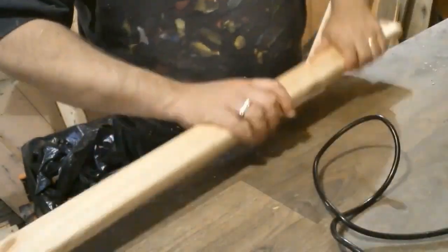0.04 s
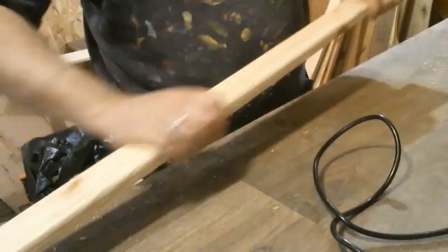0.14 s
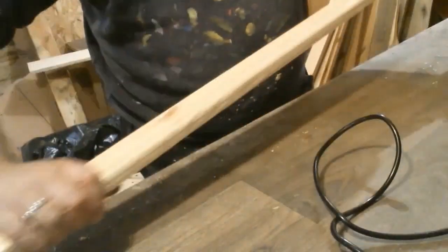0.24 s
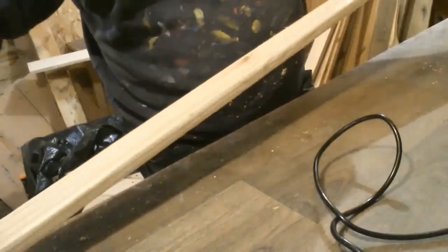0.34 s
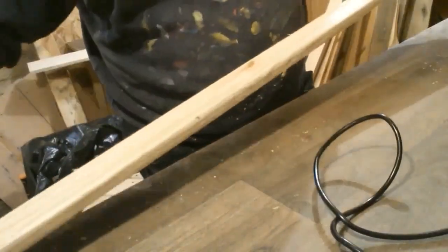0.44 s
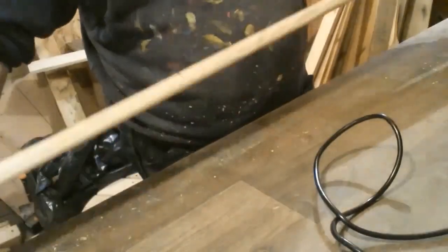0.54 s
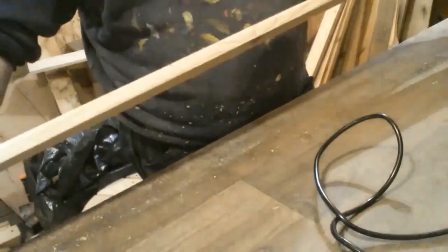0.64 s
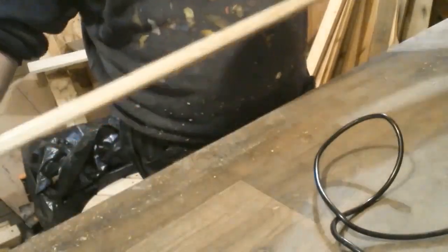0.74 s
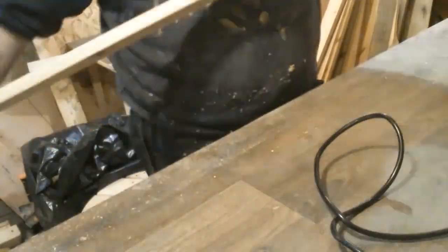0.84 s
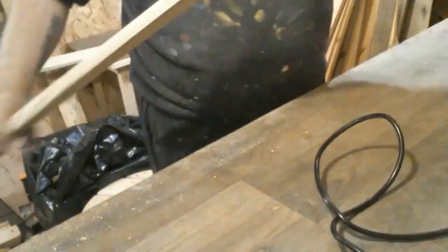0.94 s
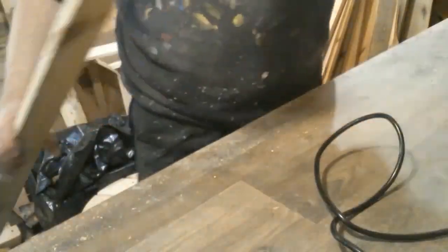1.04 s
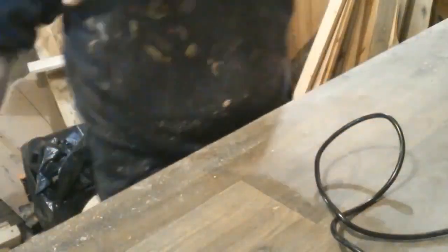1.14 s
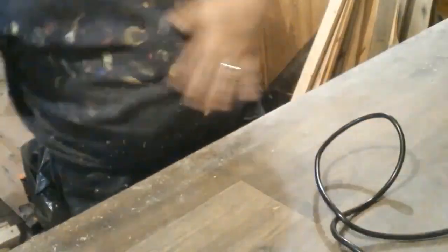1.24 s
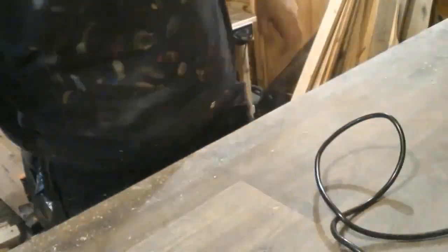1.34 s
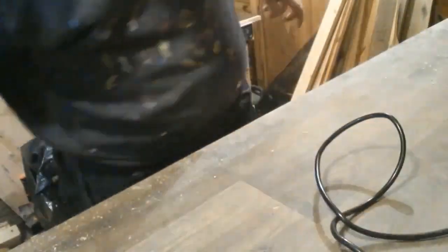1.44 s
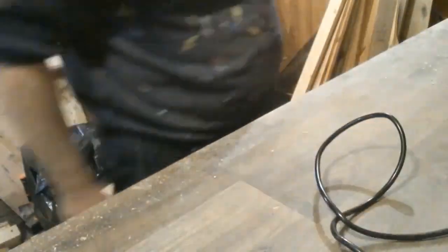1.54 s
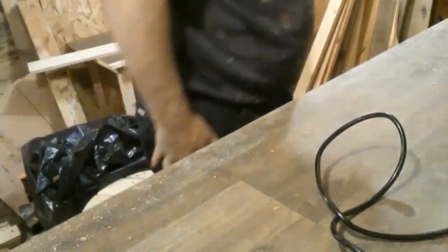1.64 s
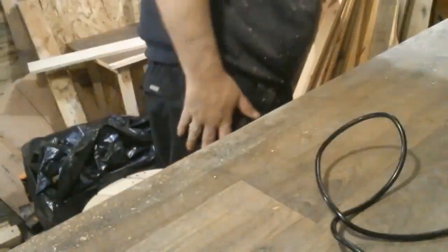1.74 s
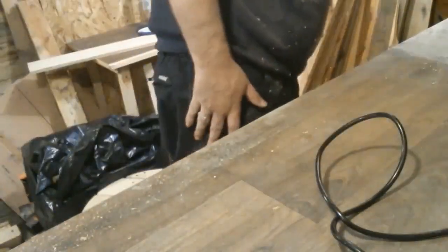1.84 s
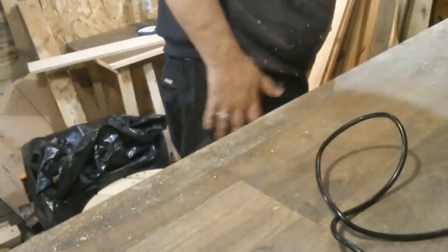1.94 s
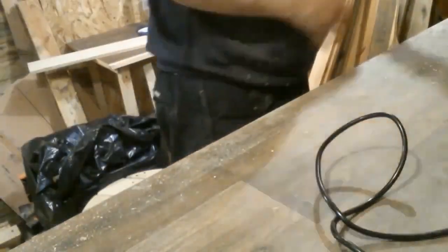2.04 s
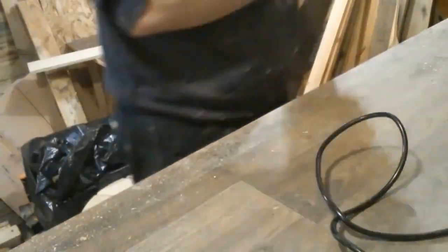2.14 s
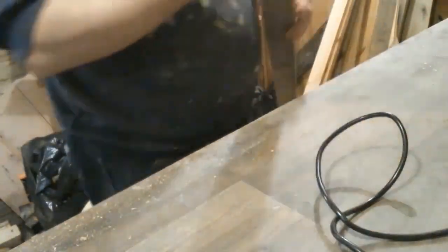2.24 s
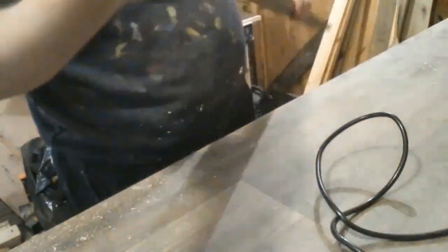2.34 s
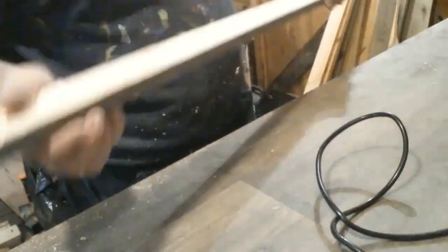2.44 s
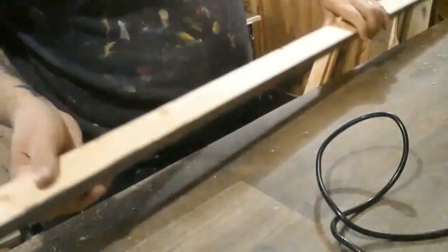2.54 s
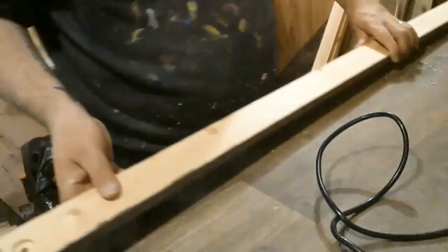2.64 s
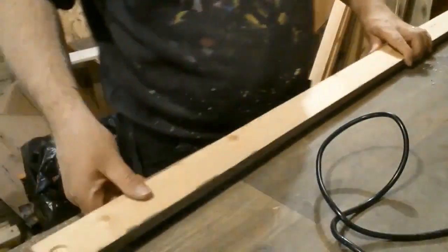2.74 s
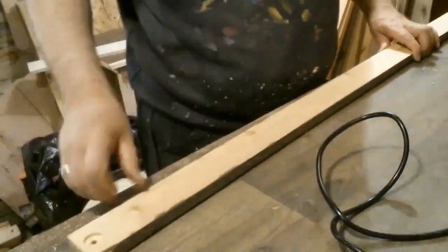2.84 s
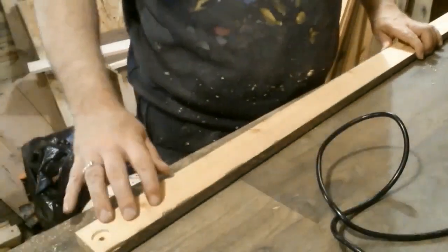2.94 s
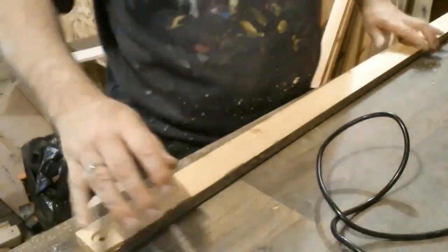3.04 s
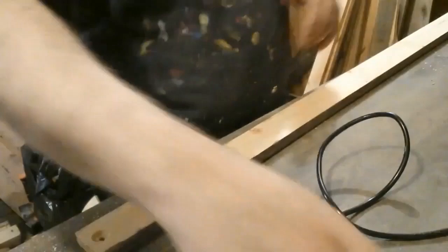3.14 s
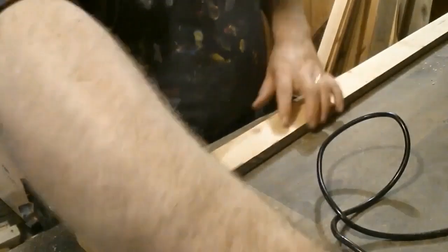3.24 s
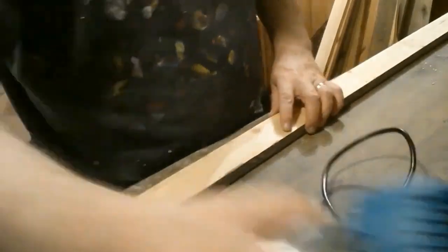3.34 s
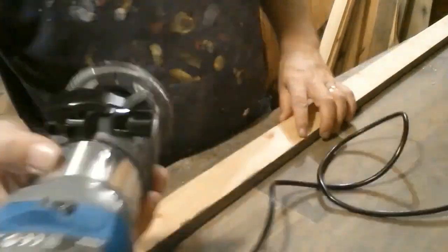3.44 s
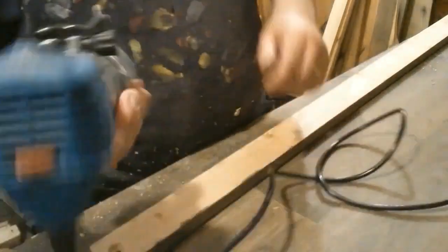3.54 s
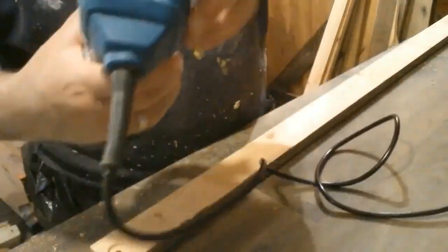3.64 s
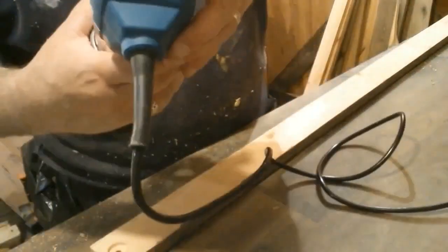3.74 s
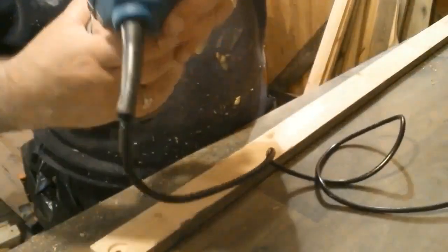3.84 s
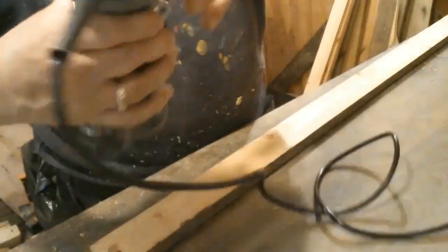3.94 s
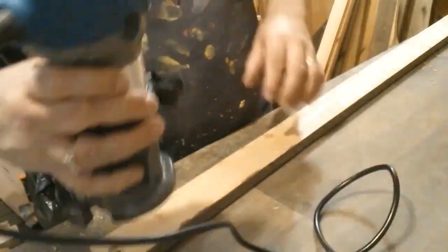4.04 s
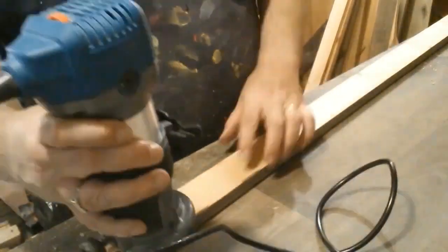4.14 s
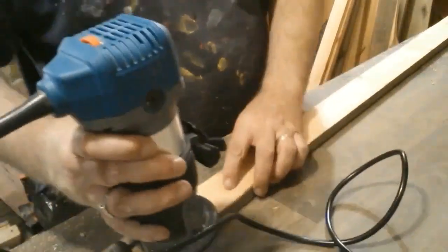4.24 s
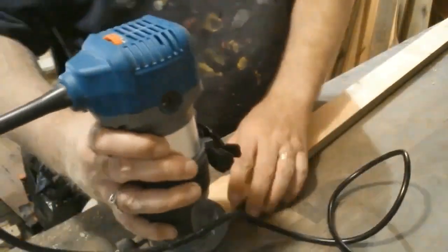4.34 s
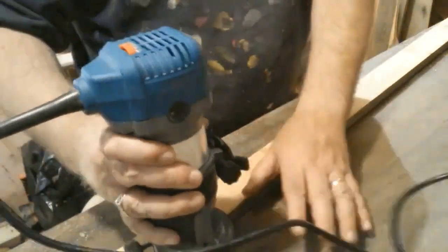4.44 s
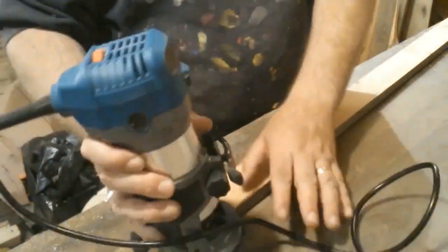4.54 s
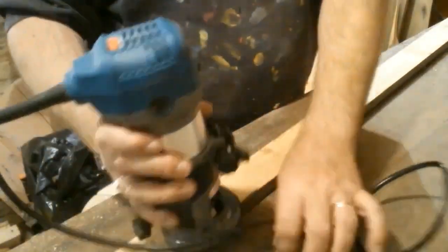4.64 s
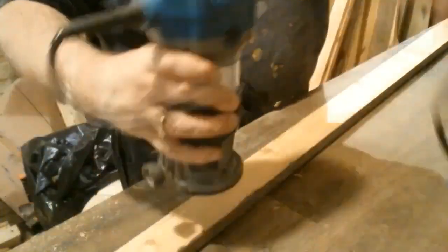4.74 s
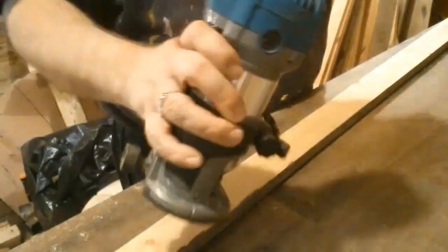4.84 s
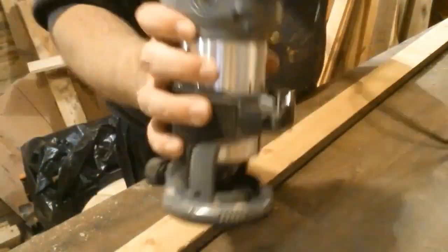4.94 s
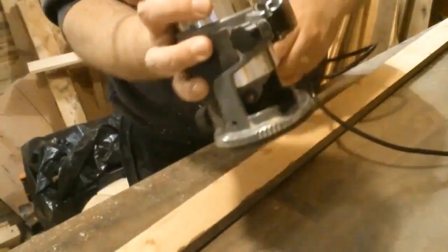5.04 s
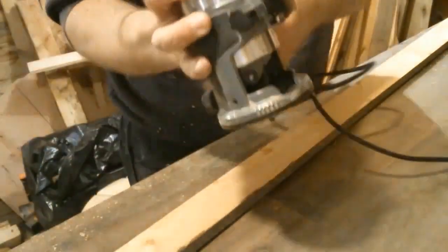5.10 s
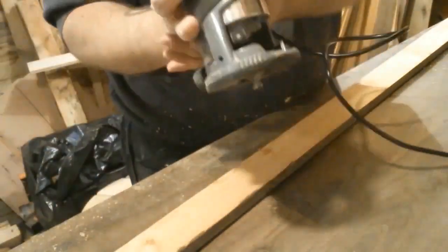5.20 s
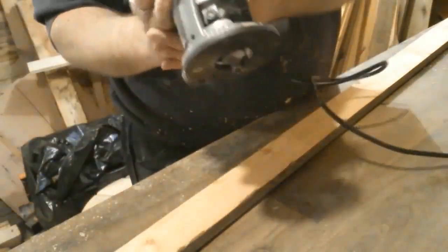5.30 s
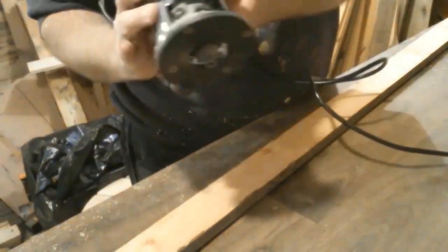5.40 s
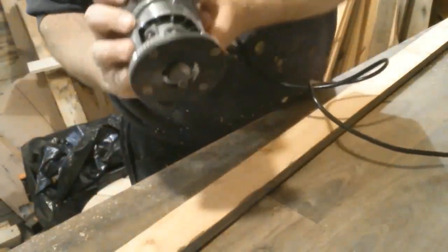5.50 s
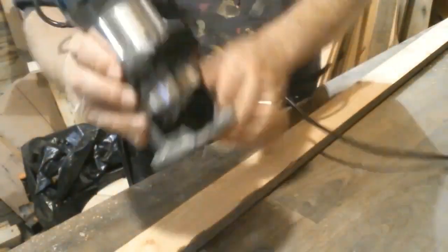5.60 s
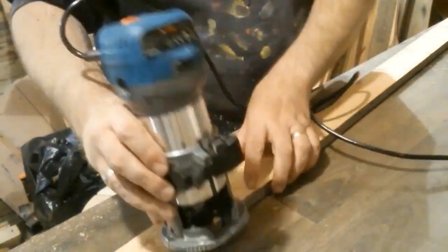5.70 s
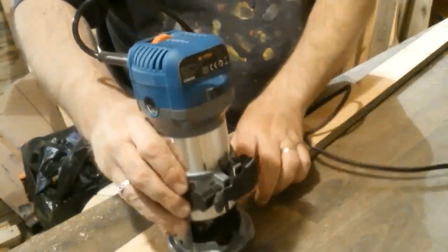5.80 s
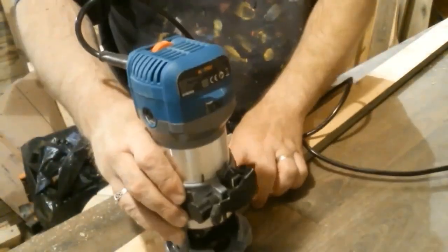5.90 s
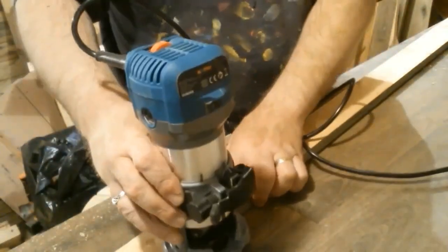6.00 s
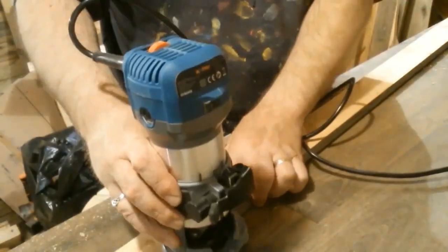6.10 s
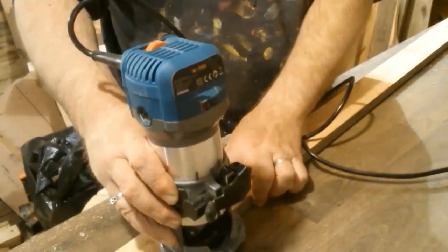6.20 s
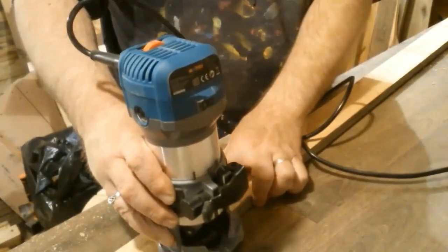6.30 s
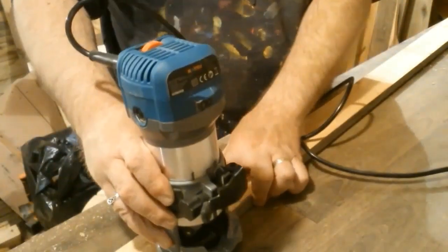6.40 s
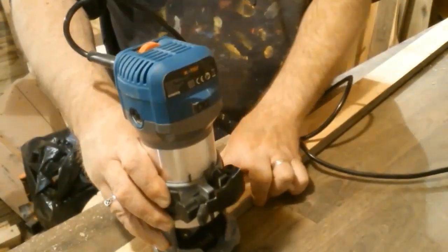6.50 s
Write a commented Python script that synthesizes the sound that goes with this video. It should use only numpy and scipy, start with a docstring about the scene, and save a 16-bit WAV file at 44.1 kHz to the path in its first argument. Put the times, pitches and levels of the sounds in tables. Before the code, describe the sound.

A wooden plank slides off a workbench with a brief hissy scrape and a few light knocks in the first half second. Hands and clothing rustle faintly as it is turned. A loud, hollow wooden knock comes at about 1.3 seconds, and another at 2.8 as the plank is laid down, followed by small taps. At about 3.8 seconds a compact electric router switches on and climbs quickly to a high whine over a strong hiss of cooling air. The whine flutters, surging and fading and shifting between left and right as the tool is moved. Two small bright ticks come near 4.8 and 5.2 seconds, and the base bumps softly on the wood around 5.6. From about 6.3 seconds the pitch sags slightly as the bit meets the edge, and the motor is still running at the end, around 6.5 seconds. Everything sounds close, in a small, dry workshop.

```python
"""A compact router spins up to a whine over a rush of cooling air, in a small, dry workshop.
First a man slides a plank off the bench, turns it round and lays it down: the wood scrapes and rings,
his clothes rustle. Then the motor starts, its harmonics swelling and fading as the vents swing about.
The router is tipped, set on the plank with soft bumps, and sags a little as the bit meets the edge."""
import sys
import numpy as np
from scipy import signal
from scipy.fft import rfft, irfft
from scipy.io import wavfile
from scipy.ndimage import uniform_filter1d

SR = 44100
rng = np.random.default_rng(int(sys.argv[2]) if len(sys.argv) > 2 else 0)


def waveform_to_disk(signal):
    """Save audio, clipped to [-1, 1], as 16-bit WAV at the path in sys.argv[1]."""
    frames = np.transpose(np.atleast_2d(signal))
    scaled = np.clip(frames, -1, 1) * 32767
    samples = np.round(scaled).astype(np.int16)
    wavfile.write(sys.argv[1], SR, samples)


N = 289296
TIME = np.arange(N) / SR
FRAME_S, BIN_HZ = np.arange(N // 256 + 6)[:, None] * 256 / SR, np.fft.rfftfreq(1024, 1 / SR)
ON_S, TOP_HZ = 3.8316, 1663.06  # switch-on; the pitch the whine heads for, four beats to a shaft turn
# stereo image of the handling and the room tone: f/Hz, left-right likeness (-1..1)
QUIET_LIKENESS = [(60, 0.97), (300, 1), (700, 0.9), (1400, 0.5), (3100, 0.1), (7000, -.2), (15000, -0.13)]


def amp(db):
    """Decibels to gain."""
    return 10 ** (np.asarray(db) / 20)


def unit(x):
    """Scales to rms 1."""
    return x / np.sqrt(np.mean(abs(x) ** 2) + 1e-20)


def read(points, hz):
    """Reads a spectrum on a log-frequency axis."""
    f, value = np.transpose(points)
    return np.interp(np.log(hz + 1), np.log(f + 1), value)


def curves(table, t):
    """Every column of an automation table at the times t."""
    s, *columns = np.transpose(table)
    return [np.interp(t, s, c) for c in columns]


def bell(offset, width):
    """A smooth hump of height 1 that falls to a half at width / 2 either side."""
    return .5 ** ((2 * offset / width) ** 2)


def add(mix, s, sound):
    """Mixes a stereo sound in at s seconds."""
    part = mix[:, max(round(s * SR), 0):][:, :sound.shape[1]]
    part += sound[:, :part.shape[1]]


def wander(rate_hz):
    """Smooth complex random modulation of rms 1, mostly slower than rate_hz."""
    f = np.fft.fftfreq(8192, 1 / 1000)
    white = rng.standard_normal(len(f)) + 1j * rng.standard_normal(len(f))
    slow = np.fft.ifft(white / (1 + abs(f / rate_hz) ** 2) * (abs(f) < 4 * rate_hz))
    return unit(np.interp(TIME, np.arange(len(f)) / 1000, slow))


def band(hz, width_hz):
    """A narrow band of noise around hz."""
    return np.sqrt(2) * (wander(width_hz / 2) * np.exp(2j * np.pi * hz * TIME)).real


def noise(colour_db, likeness, patchy_db, size, hollow=.45):
    """Coloured stereo noise of rms 1, with patches of size (frames, bins) that dip more than they rise."""
    a, b, c, d, mid, side = rng.standard_normal((6, len(FRAME_S), len(BIN_HZ)))
    patches = uniform_filter1d(np.array([mid + side / 2, mid - side / 2]), size[0], 1)
    patches = unit(uniform_filter1d(patches, size[1], 2))
    patches = (1 - np.exp(-hollow * patches)) / hollow
    same = np.clip(read(likeness, BIN_HZ), -1, 1)
    left = a + 1j * b
    right = same * left + np.sqrt(1 - same ** 2) * (c + 1j * d)
    colour = amp(colour_db)
    colour /= np.linalg.norm(colour, axis=-1, keepdims=True)
    spectra = np.array([left, right]) * colour * amp(patchy_db * patches)
    return unit(signal.istft(spectra.swapaxes(1, 2), nperseg=1024, noverlap=768)[1][:, :N])


def tint(x, colour):
    """Filters x by a spectrum and scales it to rms 1."""
    size = x.shape[-1]
    return unit(irfft(rfft(x) * amp(read(colour, np.fft.rfftfreq(size, 1 / SR))), size))


def stroke(start, length, attack_s=0.019, release_s=0.025):
    """Envelope of one stroke: it swells, holds and dies away."""
    rise = np.clip((TIME - start) / attack_s + .5, 0, 1)
    return rise * np.clip((start + length - TIME) / release_s + .5, 0, 1)


def handling(slide_s=0.356, fade_db_per_s=34, grain_db=1.0):
    """Wood sliding on the bench and cloth on skin: a dull rub, a grainy scrape and a fine hiss."""
    # tone of the three friction layers: f/Hz, relative level/dB
    rub_colour = [(25, -28), (55, -33.5), (110, -5.5), (190, -9), (280, 5.5), (350, -3.5), (520, -4.5),
                  (650, -3.5), (800, -13), (1100, -34.5), (1600, -36), (3000, -66.5)]
    scrape_colour = [(400, -10.5), (750, 0), (1080, -0.5), (1450, -7), (1900, -5), (2600, -8), (3900, -11),
                     (5000, -18), (10000, -58)]
    hiss_colour = [(1500, -20.5), (3000, -7.5), (4500, -2), (8000, 0), (12000, -1.5), (14500, 1.5),
                   (17000, 2.5)]
    # strokes of hands, cloth and wood: t/s, length/s, scrape level/dB, hiss level/dB
    strokes = [(0, 0.1, -54, -62), (0.196, 0.13, -61, -69), (0.349, 0.087, -93, -56),
               (0.453, 0.032, -75, -58.5), (0.519, .1, -90, -67.5), (0.651, 0.12, -81, -66),
               (0.713, 0.018, -65, -58.5), (0.797, 0.042, -70.5, -64), (0.81, 0.3, -79, -58.5),
               (1.129, 0.018, -57.5, -52), (1.146, 0.036, -66, -70), (1.195, 0.096, -78, -62.5),
               (1.585, 0.16, -84, -76), (1.666, 0.064, -67, -65.5), (1.877, 0.1, -93, -79),
               (2.135, 0.17, -79, -72.5), (2.202, 0.16, -76, -63.5), (2.285, 0.041, -63, -68),
               (2.466, 0.44, -86.5, -75.5), (2.733, 0.083, -73, -64), (2.853, 0.037, -64.5, -68.5),
               (3.153, 0.035, -70, -71.5), (3.201, 0.1, -78.5, -72), (3.383, 0.062, -67, -66),
               (3.42, 0.19, -83.5, -77)]
    # dull rubbing as the man moves about: t/s, level/dB
    shuffle = [(0, -61), (.37, -66), (.66, -63), (.92, -61), (1.45, -69.5), (1.8, -63.5), (2.0, -69.5),
               (2.32, -63.5), (2.52, -75.5), (2.84, -67), (3.0, -74.5), (3.18, -66.5), (3.42, -65),
               (3.68, -76.5), (3.82, -76.5)]
    slide = stroke(0, slide_s) * amp(-fade_db_per_s * TIME)  # the plank is pulled off ever more lightly
    scrape, hiss = amp(-61) * slide, amp(-38.5) * slide
    for start, length, scrape_db, hiss_db in strokes:
        touch = stroke(start, length)
        scrape = np.hypot(scrape, amp(scrape_db) * touch)
        hiss = np.hypot(hiss, amp(hiss_db) * touch)
    rub = amp(curves(shuffle, TIME)[0])
    scrape = np.hypot(scrape, amp(-15) * rub)  # clothes rustle with every move
    hiss = np.hypot(hiss, amp(-11.5) * rub)
    grain = unit(amp(grain_db * wander(150).real))  # fibres catch and slip
    out = rub * noise(read(rub_colour, BIN_HZ), QUIET_LIKENESS, patchy_db=3.5, size=(16, 2))
    out += scrape * grain * noise(read(scrape_colour, BIN_HZ), QUIET_LIKENESS, patchy_db=5.5, size=(8, 3))
    out += hiss * grain * noise(read(hiss_colour, BIN_HZ), QUIET_LIKENESS, patchy_db=3.5, size=(10, 3))
    return out


def room_tone(level_db=-82):
    """The still air of the workshop, a faint bed of low noise."""
    # tone of the room: f/Hz, relative level/dB
    colour = [(30, 15.5), (200, 25.5), (600, 5.5), (1200, 6.5), (3000, 5.5), (8000, 1), (15000, -2)]
    return amp(level_db) * noise(read(colour, BIN_HZ), QUIET_LIKENESS, patchy_db=1.0, size=(20, 4))


def plank_knocks(reach_octaves=0.63, contact_s=0.00059, crack_rise_s=0.0015, crack_t60=0.04,
                 room_db=-17, room_t60=0.15):
    """Each blow rings the wood around its own pitch, with a short crack and a brief room tail."""
    # modes of the plank on the bench: f/Hz, relative level/dB, t60/s
    wood = [(263, 1.5, 0.053), (275, -4, 0.065), (358, -4, 0.061), (413, -4, 0.064), (450, -11.5, .06),
            (595, 1.5, 0.052), (713, -10, 0.098), (796, -6.5, 0.036), (866, -10, .04), (930, -6.5, 0.052),
            (966, -13.5, .045), (1110, -20.5, 0.033), (1246, -14.5, 0.069), (1530, -20.5, 0.06),
            (1630, -17.5, 0.06), (1930, -21, 0.05), (2141, -24.5, 0.05), (2300, -20.5, .06),
            (2830, -26, .045), (3354, -23.5, 0.055), (3650, -23.5, 0.06)]
    # blows of plank and hands: t/s, ring level/dB, most excited f/Hz, crack level/dB
    blows = [(0.014, -44.5, 1200, -47), (0.072, -34, 490, -56), (0.083, -39, 484, -66),
             (0.283, -49, 700, -78), (0.3, -43.5, 710, -76), (0.451, -58, 350, -86), (0.596, -54, 293, -87),
             (0.61, -55, 280, -82), (0.8157, -50.5, 600, -68), (1.1368, -66, 1100, -53.5),
             (1.328, -25, 617, -50), (1.3322, -24.5, 212, -49), (1.349, -43.5, 800, -57.5),
             (1.521, -53.5, 500, -77), (1.578, -66, 547, -80), (1.914, -65, 600, -84),
             (2.188, -57, 900, -57), (2.7941, -28.5, 800, -42.5), (2.7966, -36, 450, -64),
             (2.807, -53, 750, -73), (2.823, -55, 230, -85), (2.844, -51, 240, -83),
             (2.8608, -46, 520, -58), (2.8635, -49.5, 230, -73), (2.871, -56, 260, -73),
             (3.149, -55, 805, -67), (3.376, -60, 800, -78), (3.529, -80, 900, -70.5)]
    # tone of the crack: f/Hz, relative level/dB
    crack_colour = [(200, -17), (700, -4.5), (2000, 1), (4000, -8), (8000, -18), (15000, -15.5)]
    out, t = np.zeros((2, N)), np.arange(SR // 3) / SR
    hz, db, t60 = np.transpose(wood)[:, :, None]
    skew = 0.1505 * (-1) ** np.arange(len(wood))[:, None] * hz / 500  # modes reach the ears out of step
    modes = amp(db - 60 * t / t60) * np.sin(2 * np.pi * hz * t + np.array([skew, -skew]))
    low_cut = signal.butter(4, 182, "high", fs=SR)  # a narrow plank radiates little bass
    room_decay = amp(-60 * t / room_t60)
    crack_decay = amp(-60 * t / crack_t60) + amp(room_db) * room_decay
    for s, ring_db, blow_hz, crack_db in blows:
        grit = rng.standard_normal((4, len(t)))
        ring = (modes / (1 + (np.log2(hz / blow_hz) / reach_octaves) ** 2)).sum(axis=1)
        ring = signal.lfilter(*low_cut, ring * np.minimum(t / contact_s, 1))
        walls = grit[3] * room_decay * (t > .006)
        ring += amp(room_db) * signal.fftconvolve(ring, walls[None] / np.linalg.norm(walls))[:, :len(t)]
        crack = tint(grit[0] + 0.51 * grit[1:3], crack_colour)
        crack *= crack_decay * np.minimum(t / crack_rise_s, 1)
        add(out, s, amp(ring_db) * ring / abs(ring).max() + amp(crack_db) * crack)
    return out


def motor_pitch(t, kick_share=.6359, kick_s=.0746, creep_s=.255, droop_hz_per_s=32.56):
    """Whine pitch in Hz: a quick kick and a slower creep upward, a steady droop, a sag under load."""
    # the bit meets the edge: t/s, pitch lost/Hz
    load = [(5.85, 0), (6.21, -7), (6.28, 27), (6.33, 35), (6.44, 40), (6.55, 62)]
    running_s = np.maximum(t - ON_S, 0)
    to_gain = kick_share * np.exp(-running_s / kick_s) + (1 - kick_share) * np.exp(-running_s / creep_s)
    return TOP_HZ * (1 - to_gain) - droop_hz_per_s * running_s - curves(load, t)[0]


def motor_whine(jitter=0.00039, drift_db=3.5, sway_rad=0.3, flutter_depth=0.6, flutter_hz=43,
                scatter_db=-64, db_per_decade=53.5):
    """Harmonics beam from the vents and shift as the router turns; swirling air makes them flutter."""
    # main harmonics: t/s, level/dB, left minus right/dB, left phase lead/rad
    fundamental = [(3.9, -68, 1, 0.5), (4.06, -67.5, 2.5, 1.5), (4.19, -47.5, 4.5, 0.3),
                   (4.38, -51, 14.5, -1), (4.75, -54, 18, -3), (4.95, -63.5, -3, -1), (5.14, -67, 1, 3),
                   (5.25, -57, -1, 4), (5.35, -74, -1.5, 1.5), (5.42, -57.5, -6.5, 2), (5.49, -71, -11, 3),
                   (5.6, -59, -1.5, 3), (5.999, -56.5, 4, 2.8), (6.2, -52, 22, 1.1), (6.3, -54, -1, .7),
                   (6.52, -47, 4, 0.3)]
    octave = [(3.9, -73, 5, 0.21), (3.99, -48.5, 3, .5), (4.039, -61, 0.5, 0.3), (4.26, -58.5, -2, 0.39),
              (4.36, -51, 3, -0.91), (4.66, -56.5, -4.5, -1.5), (4.74, -50, 0, -.4), (4.81, -64, 0.5, 0),
              (4.92, -65.5, -1, -0.34), (5.2, -56.5, 5, .7), (5.55, -51, 4, .4), (5.64, -66, -3, -1),
              (5.72, -54, -7, -2), (6.27, -53, -5, -1.2), (6.5, -50, 2.5, -1.3)]
    third = [(3.94, -66, 0, -1.5), (4.05, -49, 0, 1), (4.11, -55, 0, 1.5), (4.15, -45, 0, 0.7),
             (4.23, -43.5, 0, 2.3), (4.38, -48, 0, 2.5), (4.47, -70, 0, -0.5), (4.68, -65.5, 0, .5),
             (4.77, -48.5, 0, -0.5), (4.899, -68, 0, .5), (5.35, -59.5, 0, 1.5), (5.5, -71, 0, 0),
             (6.5, -60.5, 0, -1.5)]  # sings during the run-up
    fourth = [(3.95, -59, 0, 0), (4.15, -62.5, -4.5, 2), (4.21, -40, -9, 1.5), (4.3, -41.5, -12, 1.5),
              (4.34, -51, 3, 2.5), (4.39, -45.5, 4, 2.5), (4.5, -41.5, 2.5, -0.4), (4.88, -46, -0.5, 0.8),
              (5.05, -67, 0.5, 0.5), (5.22, -55, -0.5, 0.7), (5.451, -67.5, -1, -0.5), (5.76, -52, -1, 0),
              (6.1, -47.5, 4, -1), (6.28, -53, 1, -1), (6.52, -51, -3, 1)]  # rings most with the router upright
    eighth = [(3.95, -64, -2, 0), (4.0, -49, -6, 5), (4.035, -36.5, -5, -2), (4.08, -48.5, -2, -1.5),
              (4.35, -45, 5.5, .3), (4.5, -44.5, -1, .3), (4.61, -55, -6, -0.5), (4.76, -45, -2, -0.5),
              (4.94, -49, 1.5, 0.5), (5.031, -45, 1, 2.5), (5.11, -39.5, -1.5, -0.7), (5.2, -53.5, -2.5, 3),
              (5.29, -44.5, -1, 0), (5.38, -40, -3.5, 0), (5.54, -42, -1, -2), (5.59, -46, -4, 4),
              (5.665, -58, 0, 1), (5.71, -38, -1, 1.5), (5.8, -39, -2, -1), (5.84, -47, 0, 3.1),
              (6.2, -48, -0.5, 3.1), (6.24, -47, 0, -3), (6.28, -57, -1, -3), (6.33, -52, 2, 2),
              (6.45, -50, -3, -3), (6.53, -43.5, -11, 0.5)]  # piercing, comes in surges
    # weak harmonics 5, 6, 7, 9, 10 and 12 at top speed: level/dB
    weak_db = [-62, -63.5, -63.5, -60, -64.5, -57.5]
    # flares as the router turns, one list each for harmonics 5, 6 and 7: t/s, length/s, boost/dB
    flare_lists = [
        [(4.16, 0.09, 18), (4.77, 0.15, 8), (6.28, 0.07, 15)],
        [(4.27, 0.13, 15), (6.5, 0.11, 14)],
        [(4.298, 0.14, 11)],
    ]
    hz = motor_pitch(TIME)
    cycles = np.cumsum(hz * (1 + jitter * wander(24).real)) / SR
    speed_db = db_per_decade * np.log10(np.maximum(hz, 1) / TOP_HZ)
    main = {1: fundamental, 2: octave, 3: third, 4: fourth, 8: eighth}
    partials = {k: curves(table, TIME) for k, table in main.items()}
    flares = dict(zip((5, 6, 7), flare_lists))
    for k, db in zip((5, 6, 7, 9, 10, 12), weak_db):
        flare_db = sum(boost_db * bell(TIME - s, length) for s, length, boost_db in flares.get(k, []))
        partials[k] = db + speed_db + flare_db, 0, 0.9
    out = np.zeros((2, N))
    for k, (db, left_db, lead_rad) in partials.items():
        swirl = np.sqrt(k / 8)  # high harmonics waver more, and flutter faster
        level = amp(db + swirl * drift_db * wander(7.7).real)
        for ear, side in zip(out, (1, -1)):
            pan = amp(side * left_db / 2) / np.sqrt((amp(left_db) + amp(-left_db)) / 2)
            phase = side * lead_rad / 2 + sway_rad * swirl * wander(3.3).real
            flutter = unit(1 + flutter_depth * swirl * wander(flutter_hz * swirl))
            direct = level * pan * flutter * np.exp(1j * phase)
            reflected = amp(scatter_db + speed_db) * wander(24)  # each ear meets its own reflections
            ear += np.sqrt(2) * ((direct + reflected) * np.exp(2j * np.pi * k * cycles)).real
    return out * np.clip((TIME - ON_S) / .12, 0, 1) ** 4


def air_colour(morph_s=0.12, edge_lag_s=0.065, lowest_hz=876, db_per_octave=220):
    """Spectrum of the rush in dB, frame by frame: a hollow tone that morphs as the router turns."""
    # the four successive tones of the rush: f/Hz, relative level/dB
    first_tone = [(530, -49), (900, -22.5), (1100, -15), (1450, -20.5), (2080, -5), (2520, -2.5),
                  (3010, -4.5), (3400, -2), (4400, -0.5), (5600, -1), (7480, -1.5), (10300, -0.5),
                  (15700, -1)]
    second_tone = [(1800, -19.5), (2100, -10.5), (2500, -7), (2900, -8.5), (3500, -1), (4400, -1),
                   (5600, -3.5), (6700, 0), (7600, -4.5), (9300, -3), (11000, -2), (12200, -7.5),
                   (13800, -1.5), (15300, -1.1)]
    third_tone = [(1800, -25.5), (2100, -11.5), (2500, -6), (2900, -5), (3500, -1), (4400, 2), (5600, -0.5),
                  (6700, -5.5), (7600, -4), (9300, -5), (11000, 3), (12200, -3), (13800, -1.5), (15300, 1)]
    last_tone = [(1800, -21), (2100, -17), (2500, -9.5), (2900, -9.5), (3500, -0.5), (4400, -3.5),
                 (5600, -1.5), (6700, -4), (7600, -6), (9300, -6.5), (11000, -2), (12200, -11),
                 (13800, -3.5), (15300, -1.5)]
    # times when the rush changes tone: t/s
    tone_changes = [4.195, 5.23, 5.36]
    # brief hollows as the base nears the wood: t/s, length/s, f/Hz, width/octaves, depth/dB
    hollows = [(4.837, 0.15, 4000, 0.49, 6.5), (5.684, 0.085, 3840, 0.79, 8)]
    # fixed peaks and notches that make the rush sound hollow: f/Hz, width/Hz, gain/dB
    eq_bands = [(1806, 120, -11), (1910, 190, 2.5), (2320, 100, -3.5), (3010, 260, -3.5), (3430, 190, 0),
                (3590, 120, -1), (3760, 500, 1), (4340, 190, 1), (4830, 280, -4), (5680, 220, 1.5),
                (7060, 1200, -1), (8300, 300, 0), (7970, 190, -0.5), (9300, 1000, 1), (11800, 480, 2)]
    colour_db = read(first_tone, BIN_HZ)
    for s, next_tone in zip(tone_changes, (second_tone, third_tone, last_tone)):
        crossfade = np.clip((FRAME_S - s) / morph_s + .5, 0, 1)
        colour_db = colour_db + (read(next_tone, BIN_HZ) - colour_db) * crossfade
    edge_hz = np.maximum(motor_pitch(FRAME_S - edge_lag_s), lowest_hz)  # a low cut trails the whine
    colour_db -= db_per_octave * np.maximum(np.log2(edge_hz / (BIN_HZ + 1)), 0)
    for s, length, hz, octaves, depth_db in hollows:
        colour_db -= depth_db * bell(FRAME_S - s, length) * bell(np.log2((BIN_HZ + 1) / hz), octaves)
    return colour_db + sum(db * bell(BIN_HZ - hz, width) for hz, width, db in eq_bands)


def cooling_air(start_s=3.85, surge_db=7, gust_db=0.8):
    """The fan's rush through the vents, pulsing once a turn and louder while the motor strains."""
    # stereo image of the rush: f/Hz, left-right likeness (-1..1)
    likeness = [(1000, 0.94), (1600, 1), (2500, 0.89), (3400, 0.6), (4500, -0.31), (6500, 0.37),
                (9000, 0.051), (15000, 0.088)]
    # patches that come and go, deepest at the thin lower end: f/Hz, depth/dB
    patch_depth = [(1800, 8), (3000, 5), (3500, 3.8), (8000, 4.5), (15000, 3.5)]
    # the rush as the router is carried about, before surge and gusts: t/s, level/dB
    ride = [(3.87, -40.5), (3.96, -35), (4.11, -38.5), (4.2, -36.5), (4.36, -35.5), (4.44, -36.5),
            (4.7, -37), (4.87, -36), (5.15, -37.5), (5.25, -34), (5.45, -35), (5.62, -34), (5.72, -36),
            (6.1, -35.5), (6.5, -35.5)]
    rush = noise(air_colour(), likeness, patchy_db=read(patch_depth, BIN_HZ), size=(14, 3), hollow=0.79)
    hz = motor_pitch(TIME)
    strain = np.sqrt(1 - hz / TOP_HZ)
    level_db = curves(ride, TIME)[0] + surge_db * strain + gust_db * wander(16).real
    shaft_turns = np.cumsum(hz) / SR / 4
    throb = 1 + .09 * np.cos(2 * np.pi * shaft_turns)
    fade_in = np.clip((TIME - start_s) / 0.024, 0, 1) ** 2
    return rush * amp(level_db) * throb * fade_in


def motor_rasp(level_db=-86, hz=1220, below_hz=1594, fade_hz=22):
    """A faint rough band under the whine, heard whenever the motor runs a little below full speed."""
    whine_hz = motor_pitch(TIME)
    slowed = np.clip((below_hz - whine_hz) / fade_hz, 0, 1)
    spun_up = np.clip(whine_hz / hz, 0, 1) ** 2
    return amp(level_db) * band(hz, width_hz=70) * slowed * spun_up


def fitting_clicks(t60=0.02):
    """Short bright ticks of the router's fittings in the hand."""
    # ticks ahead of the low cut: t/s, level/dB
    ticks = [(4.763, -40), (5.238, -36)]
    out, t = np.zeros((2, N)), np.arange(SR // 10) / SR
    for s, db in ticks:
        add(out, s, amp(db - 60 * t / t60) * rng.standard_normal((2, len(t))))
    return signal.sosfilt(signal.butter(12, 2600, "high", fs=SR, output="sos"), out)


def base_bumps():
    """Soft swells of low resonance as the router's base touches the wood."""
    # muffled bumps: t/s, level/dB, f/Hz, width/Hz, Gaussian spread/s
    bumps = [(5.519, -67.5, 1038, 82, 0.01), (5.633, -58, 341, 152, 0.022), (5.636, -64, 587, 263, 0.02),
             (5.637, -69, 216.3, 60, 0.014), (5.628, -69, 912, 120, 0.014),
             (6.136, -64.5, 583, 71.4, 0.016), (6.141, -79, 457, 60.5, 0.014),
             (6.442, -69, 602, 58.6, 0.014), (6.522, -70, 620, 56, 0.01)]
    out = np.zeros(N)
    for s, db, hz, width_hz, spread_s in bumps:
        swell = np.exp(-((TIME - s) / spread_s) ** 2 / 2)
        out += amp(db) * band(hz, width_hz) * swell
    return signal.lfilter(*signal.butter(2, 120, "high", fs=SR), out)


def scene():
    """The plank is handled, then the router takes over, a hair left of centre."""
    router = motor_whine() + cooling_air() + motor_rasp() + fitting_clicks()
    fade_out = np.clip((3.92 - TIME) / 0.047, 0, 1)  # the small sounds fade as the motor starts
    small_sounds = (handling() + room_tone()) * fade_out
    return small_sounds + plank_knocks() + base_bumps() + router * amp([[.2], [-.2]])


def record(dry):
    """A steep high cut at 15.8 kHz over the whole mix."""
    high_cut = signal.firwin(1023, 15800, window=("kaiser", 9), fs=SR)
    return signal.oaconvolve(dry, high_cut[None], "same")


dry = scene()
out = record(dry)
waveform_to_disk(out)
```